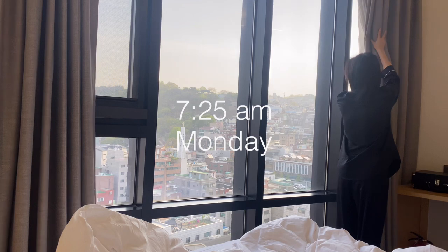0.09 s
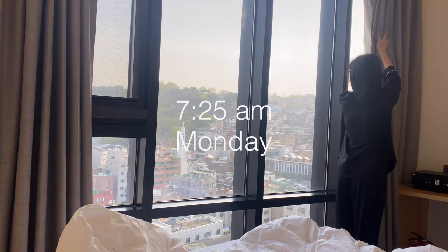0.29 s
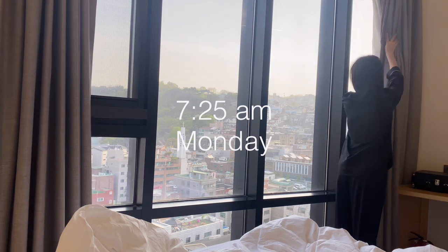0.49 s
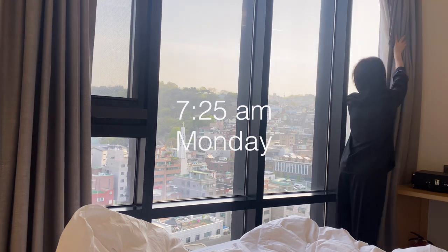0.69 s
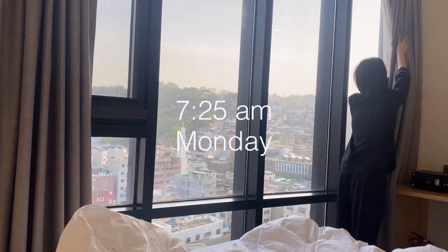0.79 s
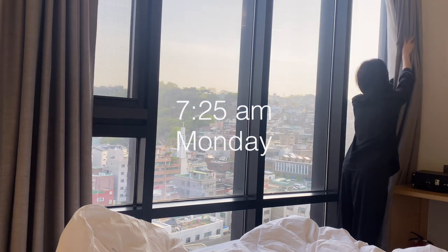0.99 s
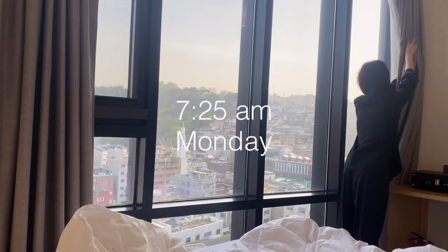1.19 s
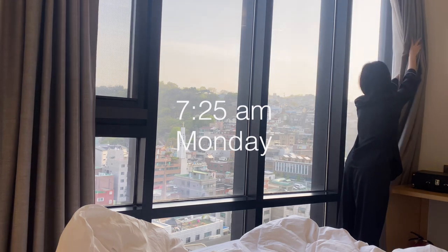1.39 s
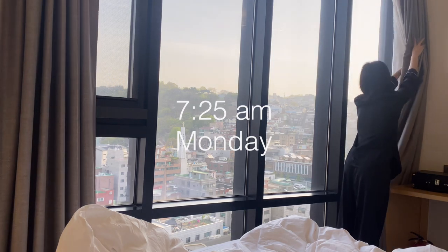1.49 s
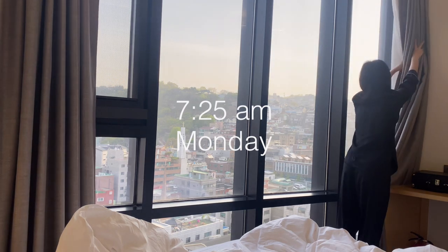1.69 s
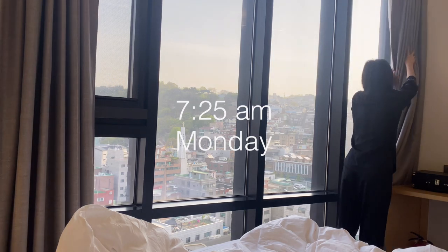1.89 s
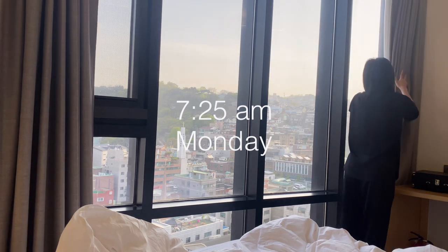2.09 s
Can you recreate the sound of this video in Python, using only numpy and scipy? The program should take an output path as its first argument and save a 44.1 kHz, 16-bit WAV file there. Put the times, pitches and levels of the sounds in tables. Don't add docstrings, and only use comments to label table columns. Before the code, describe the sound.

A heavy curtain is drawn along a ceiling rail. From about 0.1 s the gliders scrape and the cloth swishes, building to a sharp cluster of bright plastic clicks near 0.45 s. Sliding fades, with small ticks around 0.7 to 0.8 s and a lull until 1.4 s. A second, shorter tug peaks near 1.6 s with duller rattles, then dies into low ventilation hum and faint hiss.

```python
import sys
import numpy as np
from scipy import signal
from scipy.fft import rfft, irfft, next_fast_len
from scipy.io import wavfile
from scipy.ndimage import uniform_filter1d

SR = 44100
rng = np.random.default_rng(int(sys.argv[2]) if len(sys.argv) > 2 else 0)


def ratio(d):
    e = np.asarray(d, float) / 20
    return 10 ** e


def store_pcm(level_fs):
    pcm = np.round(np.clip(level_fs, -1, 1) * 32767).astype(np.int16)
    wavfile.write(sys.argv[1], SR, np.atleast_2d(pcm).T)


N = 92610

# f/Hz, density/dB
RUMBLE_SPECTRUM = [(25, -23), (52, -12), (70, -7.5), (130, -3), (300, -14.5), (466, -40), (756, -16),
                   (1100, -51.5)]
# f/Hz, density/dB
HISS_SPECTRUM = [(300, -6), (1000, 2.5), (2700, -1.5), (5500, -4.5), (7500, -11.5), (9300, -11),
                 (11500, -9.5), (14500, -67)]
# t/s, level/dB
HUM_SWELL = [(0.0, -63.5), (0.18, -58), (0.26, -66.5), (0.44, -52), (0.55, -71), (0.6, -59), (0.74, -55.5),
             (0.79, -65), (0.88, -59.5), (1.17, -62), (1.23, -56), (1.47, -61), (1.75, -54), (1.82, -76),
             (1.85, -57.5), (2.1, -56)]
# t/s, level/dB, ring/dB
PULL = [(0, -94, -3), (.1, -67, -6), (.2, -55, -6), (.3, -50, -6), (.41, -50, -11), (.465, -44.5, 5),
        (.54, -52, -6.5), (.73, -57, -3.5), (.83, -59, -7.5), (1.01, -59, -2), (1.27, -66, 0),
        (1.40, -60, -1.5), (1.43, -50.5, -16), (1.47, -52, -4), (1.6, -45.5, -4.5), (1.74, -62, -25),
        (1.86, -66.5, -24), (2.1, -66.5, -8)]
# f/Hz, density/dB
SCRAPE_SPECTRUM = [(500, -11), (1000, -0.5), (2800, 2), (5000, -3), (7500, -9), (9300, -15), (12000, -15.5),
                   (14800, -18.5)]
# f/Hz, density/dB
SLIDING_RING_SPECTRUM = [(5400, -8), (5900, 2), (6200, -16.5), (6700, 4.5), (7200, -7.5), (7900, -28.5)]
# t/s, level/dB
CLOTH_MOVE = [(0, -92), (.15, -60), (.3, -49.5), (.48, -51.5), (.56, -54.5), (.74, -57.5), (.9, -67.5),
              (1.18, -57), (1.27, -66), (1.43, -58.5), (1.55, -46.5), (1.63, -51.5), (1.76, -69),
              (2.1, -69.5)]
# f/Hz, density/dB
CLOTH_SPECTRUM = [(120, -21), (280, -4.5), (430, -12), (680, -6.5), (950, -28.5), (1500, -22), (3000, -25)]
# t/s, peak/dB, dullness/dB
KNOCKS = [(0.1181, -53, 2), (0.2008, -37.5, -0.5), (0.2144, -27.5, -18), (0.2354, -39.5, 3),
          (0.321, -51, 8), (0.3671, -38.5, 6), (0.412, -26, -22), (0.4293, -33, 9.5), (0.4442, -26, -20),
          (0.4489, -14, -20), (0.4576, -21, 1), (0.4626, -10, -22), (0.4664, -19.5, -18.5),
          (0.4754, -49, -1), (0.4794, -50, -4), (0.4972, -25.5, -29), (0.6697, -37, -10), (0.78, -26, -8),
          (0.7883, -31, -10), (0.9624, -82, -9), (1.3224, -66, -12), (1.425, -51.5, 19), (1.4308, -40, 0),
          (1.546, -32, 5), (1.551, -36.5, 2.5), (1.5879, -28, 6), (1.5942, -36, 8.5), (1.6004, -40, -11),
          (1.6176, -28.5, -15), (1.9, -61, 18.5)]
# f/Hz, level/dB, t60/s
GLIDER_MODES = [(5700, -10, 0.0041), (6550, -9.5, 0.018), (7040, -4.5, 0.0081), (7900, -16, 0.0017),
                (7940, -12, 0.005)]
# f/Hz, density/dB
RATTLE_SPECTRUM = [(900, -24), (2400, 7), (3200, 5), (4700, 7.5), (7500, -1), (9300, -5), (11000, 0.5),
                   (14800, -57)]
# f/Hz, likeness/-1..1
LIKENESS = [(50, 0.69), (150, 0.94), (350, 0.065), (1100, -0.23), (2900, 0.24), (4500, 0.12),
            (5450, -0.68), (5950, -0.49),
            (6500, .86), (7250, .84), (8800, -.9), (10500, .97), (11650, .96), (12950, -.99),
                 (13800, -.99), (14700, .6)]

RUMBLE_DB, RUMBLE_FLUTTER_DB, HISS_DB = -57, 0.6, -65.5
HUM_HZ, HUM_WIDTH_HZ, HUM_DB = 52.7, 1.5, -1.0
SCRAPE_DB, SLIDING_RING_DB = 2, -7
SLIPS_PER_S, SLIP_SPREAD_DB, SLIP_FLICKER_DB = 7000, 2.8, 1.0
CLOTH_FLUTTER_DB = 1.2
KNOCK_DB, CONTACT_LOW_HZ, CONTACT_HIGH_HZ, LONGEST_RING_S = -4.5, 5340, 8330, 0.009
RATTLE_DB, RATTLE_S = -14.5, 0.0096
ROOM_DB, ROOM_T60_S, WALL_CUT_HZ = -13.5, 0.33, 6700
PAN_DB, SCATTER_RAD, SCATTER_STEP_HZ = -0.65, 1.7, 180
CUTOFF_HZ = 16000


def rms_one(x):
    return x / np.sqrt(np.mean(x ** 2) + 1e-20)


def in_time(rows, axis=1):
    table = np.array(rows)
    return np.interp(np.arange(N) / SR, table[:, 0], table[:, axis])


def at_hz(points, hz):
    f_hz, value = np.transpose(points)
    return np.interp(np.log(np.maximum(hz, 1)), np.log(f_hz), value)


def drift(rate_hz):
    r = np.exp(-80 * np.pi * rate_hz / SR)
    noise = rng.standard_normal(N // 40 + 2002)
    slow = signal.lfilter([1], [1, -2 * r, r * r], noise)[2000:]
    return np.interp(np.arange(N) / 40, np.arange(len(slow)), rms_one(slow))


def colour(x, spectrum):
    hz = np.arange(N // 2 + 1) * SR / N
    (low_hz, low_db), (high_hz, high_db) = spectrum[0], spectrum[-1]
    points = [(low_hz / 2, low_db - 30)] + list(spectrum) + [(high_hz * 2, high_db - 30)]
    return rms_one(irfft(rfft(x) * ratio(at_hz(points, hz)), N))


def diffuse(spectrum):
    return colour(rng.standard_normal((2, N)), spectrum)


def ring(clicks, hz, t60_s):
    r, w = ratio(-60 / (t60_s * SR)), 2 * np.pi * hz / SR
    return signal.lfilter([0, np.sin(w)], [1, -2 * r * np.cos(w), r * r], clicks + 1e-18)


def room_air():
    hum_hz = HUM_HZ + HUM_WIDTH_HZ * drift(2.95)
    hum = np.sqrt(2) * np.sin(2 * np.pi * np.cumsum(hum_hz) / SR)
    hum = ratio(in_time(HUM_SWELL) + HUM_DB) * hum
    rumble = ratio(RUMBLE_DB + RUMBLE_FLUTTER_DB * drift(8.7)) * diffuse(RUMBLE_SPECTRUM)
    return rumble + hum + ratio(HISS_DB) * diffuse(HISS_SPECTRUM)


def scrape():
    pull_db = in_time(PULL)
    sizes = ratio(SLIP_SPREAD_DB * np.minimum(rng.exponential(1, N), 5)) * rng.choice([-1, 1], N)
    density = ratio(0.27 * (pull_db - pull_db.max()))
    happens = rng.random(N) < SLIPS_PER_S * density / SR
    slips = sizes * happens / np.sqrt(density)
    ring_db = SLIDING_RING_DB + in_time(PULL, axis=2) + 0.83 * drift(86)
    sound = colour(slips, SCRAPE_SPECTRUM) + ratio(ring_db) * colour(slips, SLIDING_RING_SPECTRUM)
    return ratio(pull_db + SCRAPE_DB + SLIP_FLICKER_DB * drift(45)) * sound


def cloth():
    return ratio(in_time(CLOTH_MOVE) + CLOTH_FLUTTER_DB * drift(21)) * diffuse(CLOTH_SPECTRUM)


def glider_ticks(t_s, peak_db):
    ticks = np.zeros(N)
    luck = rng.normal(0, 1, (len(t_s), 8))
    for k, (hz, mode_db, t60_s) in enumerate(GLIDER_MODES):
        clicks = np.zeros(N)
        for after_s, contact_db in [(0.0004, -9), (0.0011, 0), (0.0023, -11)]:
            hit_s = t_s + after_s * (1 + 0.11 * luck[:, -1])
            hit_db = peak_db + KNOCK_DB + mode_db + contact_db + 0.71 * luck[:, k]
            np.add.at(clicks, (hit_s * SR).astype(int), ratio(hit_db))
        ticks += ring(clicks, hz, min(t60_s, LONGEST_RING_S))
    contact = signal.butter(2, [CONTACT_LOW_HZ, CONTACT_HIGH_HZ], "band", fs=SR, output="sos")
    return signal.sosfilt(contact, ticks)


def rail_rattle(t_s, level_db):
    shake = np.zeros(N)
    shake[(t_s * SR).astype(int)] = ratio(level_db + RATTLE_DB)
    r = np.exp(-1 / (RATTLE_S * SR))
    shake = signal.lfilter([1], [1, -r], shake + 1e-18)
    shake = uniform_filter1d(shake, size=90)
    return shake * colour(rng.standard_normal(N), RATTLE_SPECTRUM)


def knocks():
    t_s, peak_db, dull_db = np.transpose(KNOCKS)
    return glider_ticks(t_s, peak_db) + rail_rattle(t_s, peak_db + dull_db)


def room(x):
    size = next_fast_len(N + SR)
    w = 2 * np.pi * np.arange(size // 2 + 1) / size
    dull = np.exp(-2 * np.pi * WALL_CUT_HZ / SR)
    wall = (1 - dull) / (1 - dull * np.exp(-1j * w))
    sides = [0, 0]
    for k, lag in enumerate(rng.uniform(0.004, 0.03, 16) * SR):
        loop = ratio(-60 * lag / SR / ROOM_T60_S) * wall * np.exp(-1j * w * lag)
        sides[k % 2] = sides[k % 2] + loop / (1 - loop) * (-1) ** (k // 2)
    return irfft(np.array(sides) * rfft(x, size), size)[:, :N]


def at_ports(x):
    hz = np.arange(N // 2 + 1) * SR / N
    scatter = np.interp(hz / SCATTER_STEP_HZ, np.arange(128), rng.standard_normal(128))
    turn_rad = np.pi / 2 + SCATTER_RAD * scatter
    turned = irfft(rfft(x) * np.exp(-1j * turn_rad), N)
    return np.array([(x + turned) * ratio(PAN_DB), (x - turned) * ratio(-PAN_DB)]) / np.sqrt(2)


def scene():
    air = room_air()
    rail = scrape() + knocks()
    return at_ports(rail) + ratio(ROOM_DB) * room(rail) + cloth() + air


def top_cut(x):
    return signal.sosfilt(signal.butter(12, 15900, fs=SR, output="sos"), x)


def record(dry):
    hz = np.arange(N // 2 + 1) * SR / N
    alike = np.clip(at_hz(LIKENESS, hz), -0.995, 0.995)
    mid = rfft(dry[0] + dry[1]) * np.sqrt(1 + alike)
    side = rfft(dry[0] - dry[1]) * np.sqrt(1 - alike)
    ports = irfft(np.array([mid + side, mid - side]) / 2, N)
    low_pass = signal.cheby2(10, 50, CUTOFF_HZ, fs=SR, output="sos")
    mix = signal.sosfilt(low_pass, ports)
    return top_cut(mix)


dry = scene()
out = record(dry)
store_pcm(out)
```